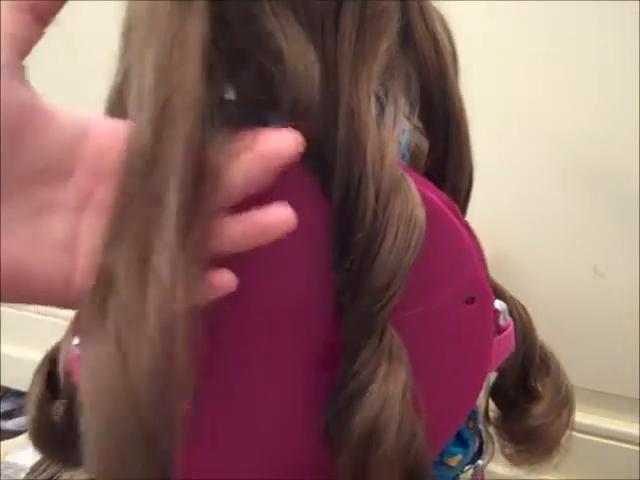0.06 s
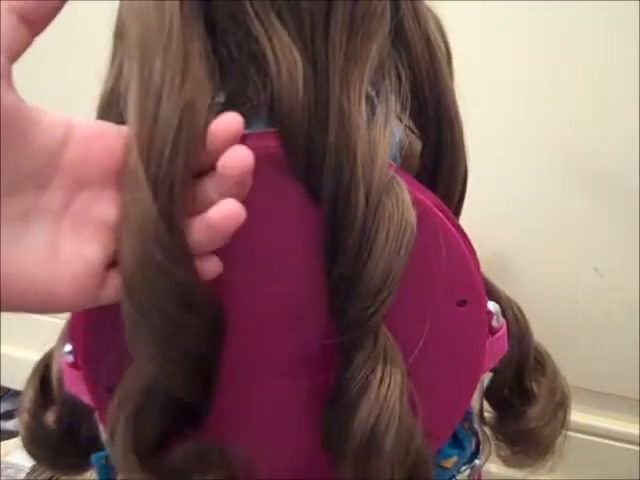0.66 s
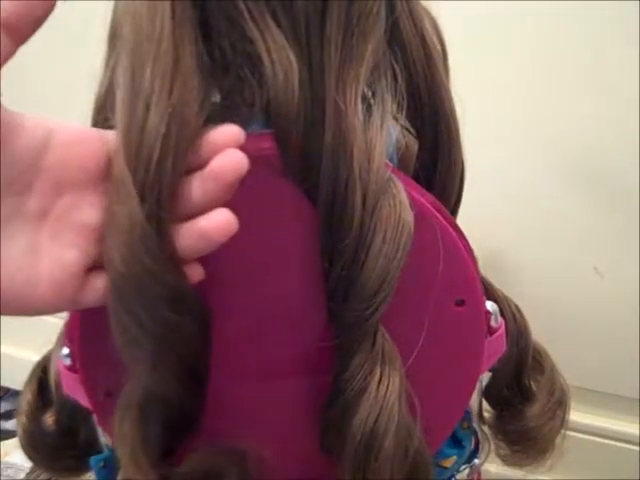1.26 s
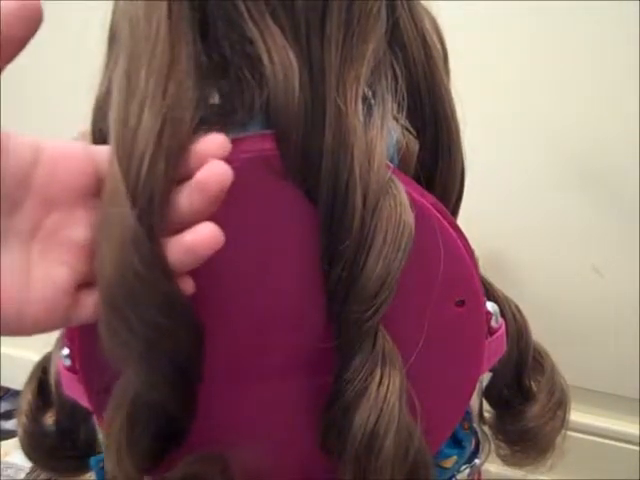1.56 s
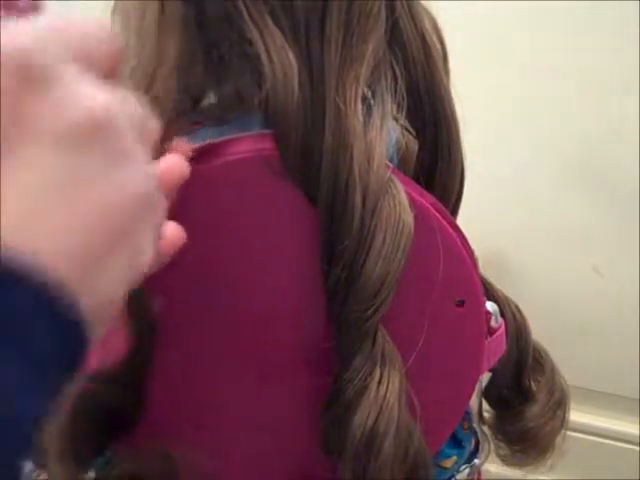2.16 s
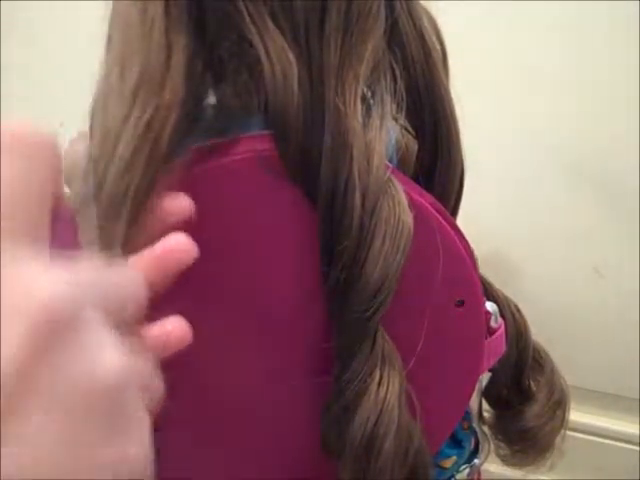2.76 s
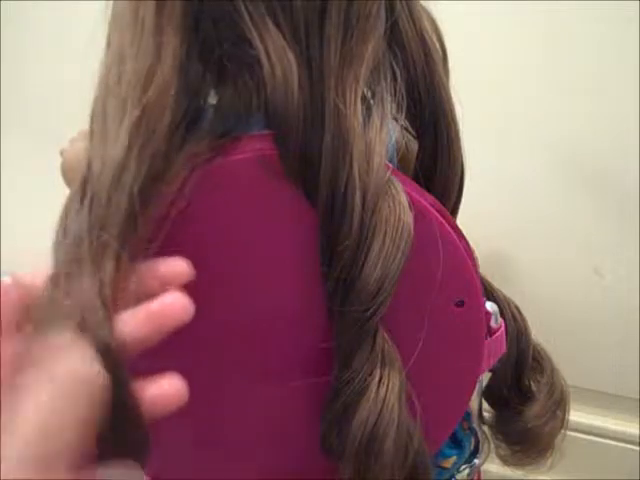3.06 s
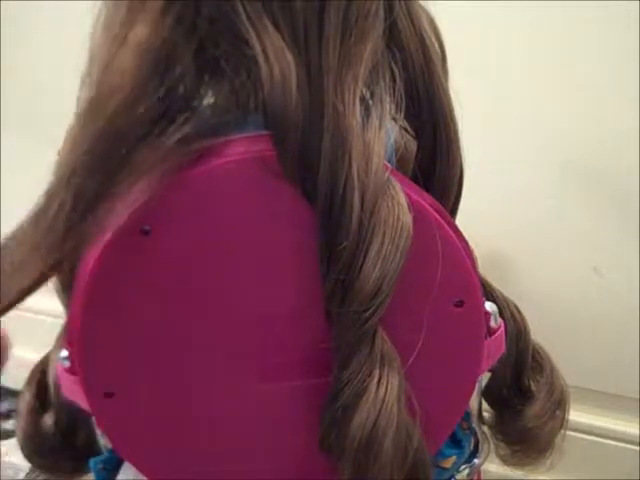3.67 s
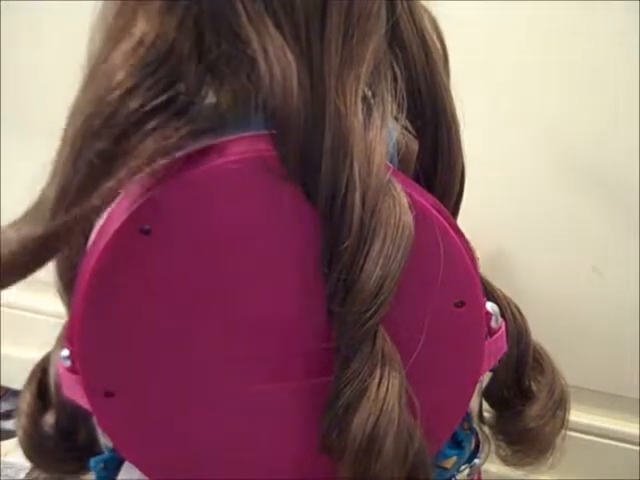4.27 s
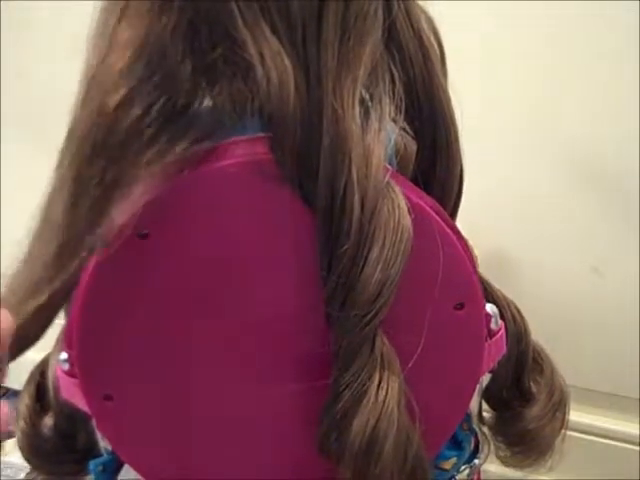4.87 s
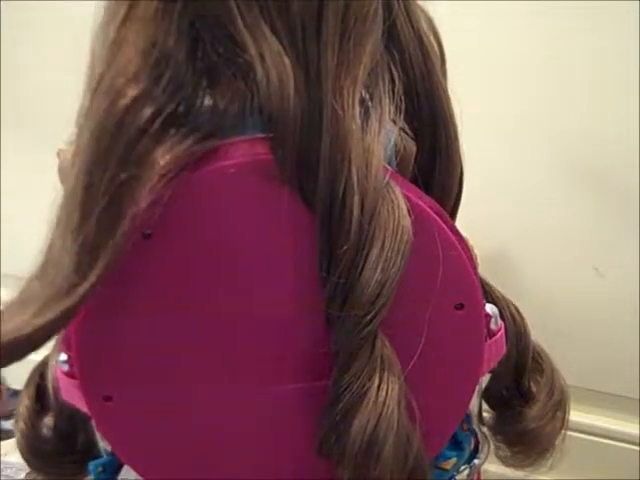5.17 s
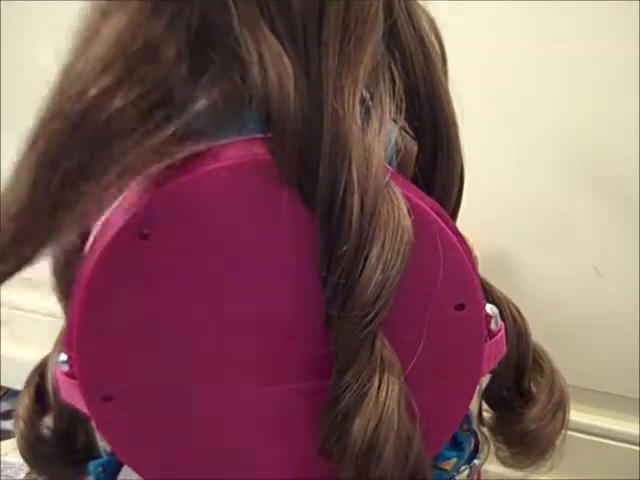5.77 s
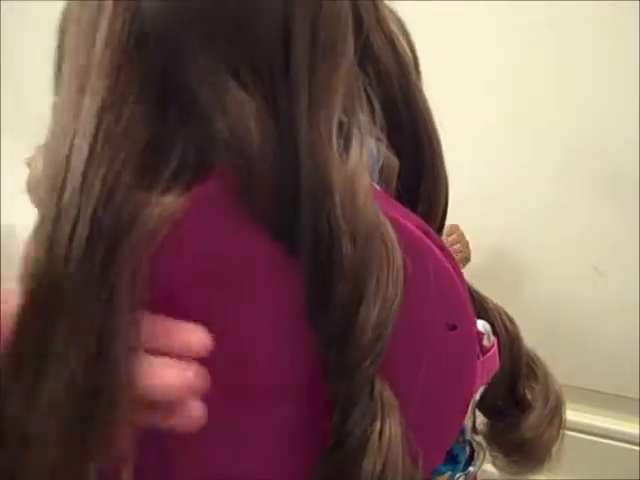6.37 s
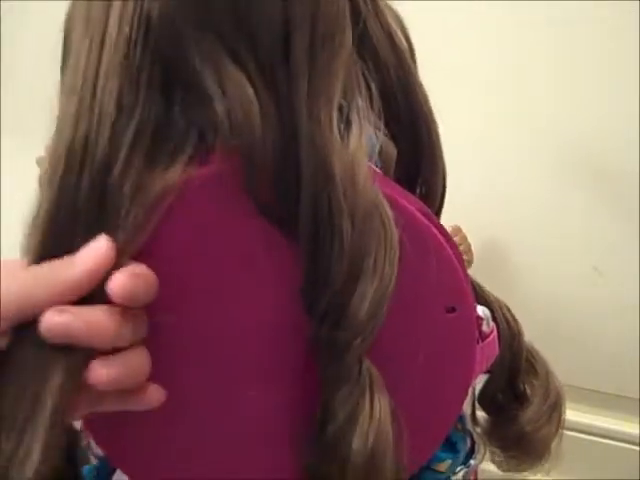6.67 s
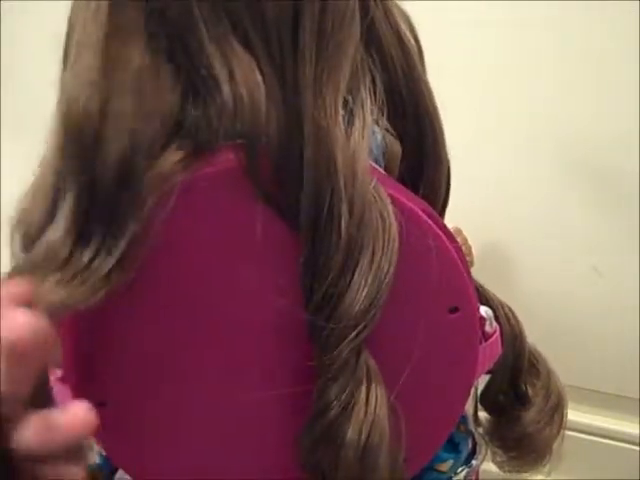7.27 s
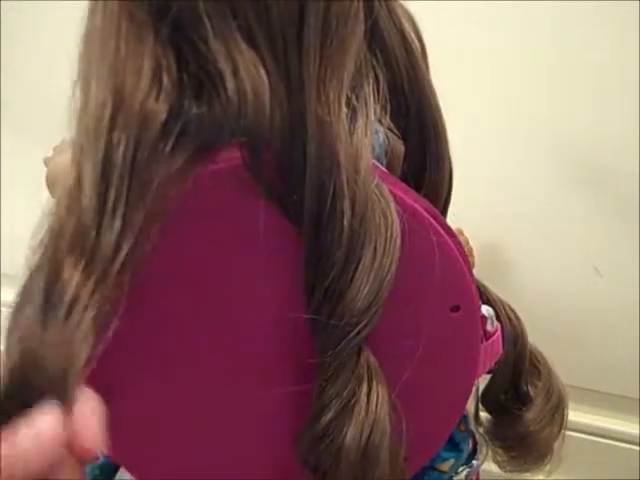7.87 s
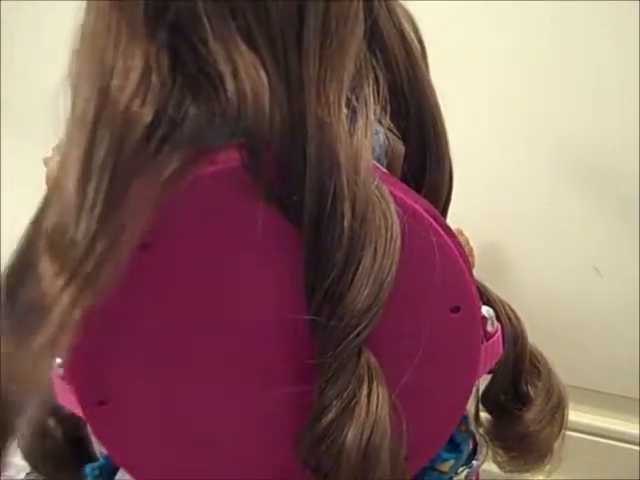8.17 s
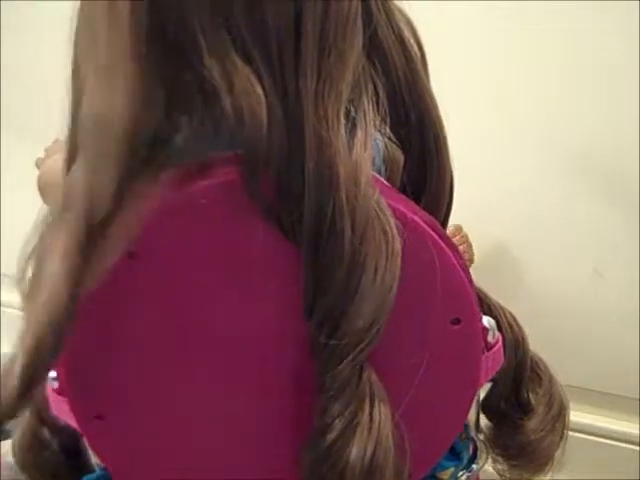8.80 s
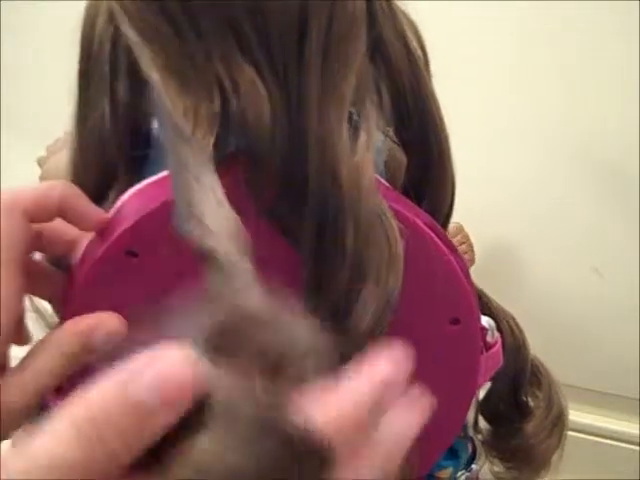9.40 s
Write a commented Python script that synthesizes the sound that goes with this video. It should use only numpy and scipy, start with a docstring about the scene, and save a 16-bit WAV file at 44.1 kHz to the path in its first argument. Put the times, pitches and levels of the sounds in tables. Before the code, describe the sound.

Hair rustles softly, a spray bottle spritzes four times and is set down hard, then a brush pulls through tangles.

```python
"""A small quiet room: a doll's hair is handled, misted and brushed at close range.
Her hollow head bumps. A trigger sprayer clicks and hisses through four pumps, then the bottle
is put down hard and rocks to rest. Brush strokes follow: strands hiss under tension, bristles
snap out of tangles and fingers slide down the hair. A distant appliance hums over soft room noise."""
import sys
import numpy as np
from scipy import signal
from scipy.fft import rfft, irfft, next_fast_len
from scipy.io import wavfile
from scipy.ndimage import map_coordinates

SR = 44100
rng = np.random.default_rng(int(sys.argv[2]) if len(sys.argv) > 2 else 0)


def materialize(psi):
    """Save the field psi as 16-bit PCM at rate SR to the path in sys.argv[1].

    A 1-D psi becomes a single channel; in a 2-D psi each row is a channel.
    """
    bounded = np.clip(np.atleast_2d(psi).T, -1, 1)
    quanta = np.round(bounded * 32767).astype(np.int16)
    wavfile.write(sys.argv[1], SR, quanta)


N = 416304

# Table levels are relative, ahead of mix gains.
# Brush pulls. Each row: start and end in seconds, then final hiss, growth and final scrape in dB.
BRUSH_PULLS = [(4.451, 4.672, -41.5, 5.5, -48.5), (4.958, 5.102, -39.5, 4.5, -46.5),
               (5.415, 5.553, -41, 7, -44), (5.973, 6.692, -45, 11.5, -59), (7.033, 7.188, -39, 16, -49.5),
               (7.572, 7.681, -45, 3.5, -54.5)]
# Finger slides. Each row: middle and half length in seconds, hiss and scrape in dB.
FINGER_SLIDES = [(0.05, .2, -59.5, -57.5), (0.416, 0.075, -50.5, -59), (0.556, 0.17, -54, -64),
                 (0.918, 0.18, -52.5, -53.5), (1.148, 0.074, -55.5, -66), (1.413, 0.093, -55, -65),
                 (1.598, 0.067, -54, -64), (2.13, 0.081, -52, -52.5), (2.62, 0.56, -56, -57),
                 (2.938, 0.078, -52, -59), (3.422, 0.081, -45, -53), (3.695, 0.15, -60.5, -59.5),
                 (3.951, 0.14, -56.5, -56), (6.136, .14, -53, -72), (6.463, 0.28, -46, -56),
                 (6.848, 0.15, -56, -74), (8.62, 0.44, -60, -71), (9.114, 0.093, -52.5, -55),
                 (9.27, 0.27, -55, -56)]
# Bristles snapping free. Each row: time in seconds, level in dB, pad and clack offsets in dB.
BRISTLE_SNAGS = [(0.373, -29, -17, -5), (0.392, -23, -12, -6), (0.928, -24.5, -20, -17),
                 (0.971, -31, -25, -22), (1.14, -28.5, -20, -12), (3.9105, -30, -27, -20),
                 (3.9594, -20.5, -3, -4.5), (3.9714, -25, -27, -14), (4.0412, -31, -22, -11),
                 (4.0696, -18, 4.5, -37), (4.0764, -22, -16.5, -17), (4.6074, -18.5, -29, -15),
                 (5.0564, -23.5, -4, -6.5), (5.0764, -9, -5.5, -14), (5.0894, -13, -1.5, -30),
                 (5.5159, -14, -29, -9), (5.5338, -10.5, -9.5, -29), (5.5424, -18, 1, -29),
                 (5.5508, -10.5, -24, -29), (6.2896, -23, -12, -6), (6.5051, -15.5, -10.5, -14),
                 (7.0414, -20, -30, -21), (7.0688, -18.5, -24, -17), (7.2145, -20, -30, -8),
                 (7.5906, -20.5, -27, -21), (7.6585, -20.5, -11.5, -24), (8.6492, -27.5, -21, -18)]
# Sprayer pumps. Each row: start and end in seconds, level and growth with pressure in dB.
SPRAY_PUMPS = [(2.147, 2.231, -25.5, 2.5), (2.464, 2.512, -28, 6), (2.734, 2.815, -26.5, 6),
               (3.032, 3.112, -25.5, 8)]
# Trigger and valve. Each row: time in seconds, level in dB, bottle and lever offsets in dB.
TRIGGER_CLICKS = [(1.921, -26, -7.5, -1.5), (1.9583, -27, -29, -28), (2.0712, -25.5, 2, 1.5),
                  (2.1173, -23.5, -24, -8), (2.1284, -22, -27, -17), (2.1507, -20.5, 7.5, -3),
                  (2.3106, -23.5, -11.5, -9.5), (2.4375, -15, -13, -25), (2.6762, -20.5, -1.5, 6),
                  (2.715, -10, -14, -22), (2.903, -29, -22, -5), (2.9595, -12.5, -3.5, 5.5),
                  (3.018, -4, -21.5, -24), (3.236, -22.5, -24.5, -11), (3.247, -22, -13, -16),
                  (3.2747, -5, -11, 1.5)]
# Bottle landing. Each row: time in seconds, shell and base levels in dB.
BOTTLE_HITS = [(3.481, -17.5, -15), (3.492, 1, -17), (3.549, -18, -29), (3.594, -32.5, -40.5),
               (3.641, -37.5, -44.5), (3.669, -39.5, -50)]
# Soft head bumps. Each row: time in seconds, level in dB.
HEAD_BUMPS = [(0.469, -32), (0.564, -33), (0.838, -32), (0.845, -28.5), (0.928, -27.5), (0.934, -33.5)]
# Light knocks. Each row: time in seconds, level in dB, pitch and width in Hz, t60 in seconds.
PLASTIC_KNOCKS = [(0.034, -31, 690, 410, 0.11), (0.034, -35, 362, 120, 0.12),
                  (0.169, -34.5, 850, 870, 0.035), (0.374, -43.5, 900, 1410, 0.066),
                  (1.135, -43.5, 890, 1220, 0.092), (1.136, -38, 4420, 1210, 0.029),
                  (1.283, -35.5, 4370, 900, 0.014), (1.361, -38.5, 1465, 199, 0.051),
                  (1.361, -40, 2880, 2420, 0.027), (1.921, -27.5, 3230, 1190, 0.016),
                  (1.928, -31.5, 5400, 900, 0.017), (3.433, -31.5, 2860, 1510, .015),
                  (6.291, -34.5, 700, 1179, 0.071), (6.429, -41, 935, 900, .025),
                  (6.732, -38.5, 835, 696, 0.029), (7.923, -24.5, 329, 241.9, 0.03),
                  (8.666, -34.5, 1000, 1200, 0.092), (9.157, -36.5, 855, 900, 0.13),
                  (9.237, -32, 1250, 1440, 0.057), (9.323, -42.5, 1420, 1086, 0.066),
                  (9.416, -42.5, 1200, 1360, 0.15)]

# Body resonances. Each row: frequency in Hz, width in Hz, gain in dB.
LEVER_MODES = [(1306, 700, -12), (2050, 560, -4), (2400, 320, 2), (2700, 340, 0), (3270, 500, -7)]
SHELL_MODES = [(1965, 250, -16.5), (3100, 600, -9), (4440, 201, 3.5), (5030, 520, -3), (7906, 440, -1),
               (11130, 4700, -22.5)]
BASE_MODES = [(218, 87, -16.5), (740, 220, -5), (1050, 330, -6), (1450, 225, -5), (2033, 151.6, -10)]
HEAD_MODES = [(75.6, 22, 2.5), (119, 22, -3.5), (185, 46, -3), (234, 21, 7.5), (352, 40, -8),
              (503, 60, -5.5), (631, 39, 1), (910, 120, -12), (1146, 39, -6), (1480, 140, -23)]

# Spectra as heard; the bright peak near 8 kHz is the microphone's resonance.
# Each row: frequency in Hz, spectral level in dB.
STRAND_SPECTRUM = [(1200, -28), (2800, -13), (5000, -11), (6600, -6), (7600, 0), (8200, 0), (9200, -10.5),
                   (11000, -17), (14000, -19.5)]
PAD_SPECTRUM = [(200, -17.5), (500, -1.5), (700, -1), (950, 1.5), (1400, -7), (2000, -8.5), (2800, -12.5),
                (4500, -14), (9000, -49)]
BRISTLE_SPECTRUM = [(1500, -34), (3500, -10.5), (5000, -3), (6300, 1.5), (7200, 4), (8100, 7.5),
                    (9500, -12.5), (14000, -19)]
MIST_SPECTRUM = [(180, -60), (300, -44), (414, -31), (1100, -27.5), (1880, -20), (2240, -20.5), (3460, -14),
                 (3750, -13.5), (4770, -9.5), (5970, -12), (7850, 0), (10800, -16.5), (14000, -20.5)]
SNAP_SPECTRUM = [(1500, -37), (3800, -4.5), (5000, -5), (6500, -3.5), (8000, 7.5), (9500, -8),
                 (14000, -22.5)]
RATTLE_SPECTRUM = [(200, -15.5), (700, 2), (1500, 1), (3400, -5), (4100, -2.5), (4470, 5), (4900, -2.5),
                   (6500, 0.5), (7800, 4), (10000, -7.5), (14000, -33)]
CRUNCH_SPECTRUM = [(300, -17), (1200, 0.5), (3000, -7.5), (7000, -3.5), (10000, -8), (14000, -34)]
ROOM_SPECTRUM = [(15, -44.5), (25, -17.5), (65, -10), (100, -10.5), (147, -6), (202, -5.5), (225, -12),
                 (363, -15.5), (539, -22.5), (1020, -26.5), (1470, -28.5), (1680, -29.5), (6160, -34.5),
                 (8240, -33), (14000, -38.5)]

# Distant appliance. Each row: frequency in Hz, level in dB.
HUM_PARTIALS = [(60, -68), (120, -59.5), (147, -57.5)]
# Room noise coherence. Each row: frequency in Hz, left-right correlation.
ROOM_COHERENCE = [(60, 0.85), (130, 0.76), (290, .72), (640, 0.456), (1400, 0.12), (3000, 0.021)]
# Room noise balance. Each row: frequency in Hz, left minus right in dB.
ROOM_BALANCE = [(60, -8.5), (200, -1), (400, 2.5), (800, 6.5), (4400, 3), (8000, 3.5), (14000, 0)]
# Wall reverberation. Each row: frequency in Hz, t60 in seconds.
WALL_DECAY = [(150, 0.54), (800, 0.15), (3000, 0.27), (8000, 0.19), (14000, 0.11)]
# Shadowing. Each row: frequency in Hz, factor on the left-right difference.
SHADOW = [(200, .1), (1000, 0.1), (4000, 0.58), (8000, 1.125), (13000, 1.19)]

BITE_S, RELEASE_DB_PER_S = 0.01, 281  # bristles enter; strands settle
REST_HISS_DB, REST_SCRAPE_DB = -67.5, -67.5  # hair never lies quite still
STRAY_PER_S, STRAY_DB = 12, -71
CREAK_PER_S, CREAK_DB, CREAK_REACH_S = 60, -58, 0.12  # spring ticks around each pump
SQUEEZE_LEAD_S, SQUEEZE_HALF_S = 0.0302, 0.082  # squeeze peaks just before the mist
BAND_LIMIT_HZ = 14300


def hair():
    """Strands hiss and prickle under brush and fingers; bristles catch and snap free."""
    hiss_level, scrape_level = rubbing_levels()
    grip = amp(0.9 * wobble(70) - 2.5)
    strands = friction(STRAND_SPECTRUM, grain_db=2.5, grain_per_s=1500)
    flicks = amp(-10.5) * prickles(per_s=190)
    hiss = hiss_level * grip * (strands + flicks)
    scrape = scrape_level * grip * friction(PAD_SPECTRUM, grain_db=5, grain_per_s=350)
    snags = clicks(BRISTLE_SNAGS, BRISTLE_SPECTRUM, snap_t60_s=0.0075,
                   body=band(hz=913, width_hz=470), body_t60_s=0.017,
                   clack=band(hz=2950, width_hz=3800), clack_t60_s=0.034)
    strays = amp(STRAY_DB) * prickles(STRAY_PER_S)
    return (placed(hiss, left_db=8, room_db=-13.5)
            + placed(scrape, left_db=2, room_db=-5)
            + placed(amp(-5) * snags + strays, left_db=8.5, room_db=-11.5))


def rubbing_levels():
    """Hiss and scrape envelopes: a pull bites, tightens and lets go; a slide swells and fades."""
    t = np.arange(N) / SR
    hiss_power = np.full(N, amp(REST_HISS_DB) ** 2)
    scrape_power = np.full(N, amp(REST_SCRAPE_DB) ** 2)
    for start_s, end_s, hiss_db, growth_db, scrape_db in BRUSH_PULLS:
        slack = np.clip((end_s - t) / (end_s - start_s), 0, 1)
        bite = np.clip((t - start_s) / BITE_S, 0, 1)
        release_db = RELEASE_DB_PER_S * np.clip(t - end_s, 0, 1)
        pull = bite * amp(-growth_db * slack - release_db)
        hiss_power += (amp(hiss_db) * pull) ** 2
        scrape_power += (amp(scrape_db - 2 * slack) * pull) ** 2
    for middle_s, half_s, hiss_db, scrape_db in FINGER_SLIDES:
        swell = np.clip(1 - ((t - middle_s) / half_s) ** 2, 0, 1) ** 2
        hiss_power += (amp(hiss_db) * swell) ** 2
        scrape_power += (amp(scrape_db) * swell) ** 2
    return np.sqrt(hiss_power), np.sqrt(scrape_power)


def sprayer():
    """The trigger creaks and clicks, the squeezed bottle hums and the mist grows with pressure."""
    t = np.arange(N) / SR
    flow, squeeze, creaking = np.zeros((3, N))
    for start_s, end_s, db, growth_db in SPRAY_PUMPS:
        valve = np.clip((t - start_s) / 0.0056, 0, 1) * np.clip((end_s - t) / 0.015 + 0.5, 0, 1)
        pressure = np.sqrt(np.clip((t - start_s) / (end_s - start_s), 0, 1))
        flow += valve * amp(db + growth_db * (pressure - 0.3))
        squeeze += np.clip(1 - np.abs(t - start_s + SQUEEZE_LEAD_S) / SQUEEZE_HALF_S, 0, 1)
        creaking[(t > start_s - CREAK_REACH_S) & (t < end_s + CREAK_REACH_S)] = 1
    mist = flow * friction(MIST_SPECTRUM, grain_db=1, grain_per_s=1100)
    # droplets land on the hair, to one side of the jet
    patter = amp(-9.5) * flow * friction(STRAND_SPECTRUM, grain_db=2, grain_per_s=1100)
    hum = amp(-51.5) * squeeze * unit(filtered(rng.standard_normal(N), band(hz=472, width_hz=130)))
    creaks = amp(CREAK_DB) * creaking * prickles(CREAK_PER_S)
    trigger = clicks(TRIGGER_CLICKS, SNAP_SPECTRUM, snap_t60_s=0.0063,
                     body=band(hz=520, width_hz=400), body_t60_s=0.04995,
                     clack=resonances(LEVER_MODES), clack_t60_s=0.013)
    return (placed(mist + hum, left_db=4.5, room_db=-12, near_db=-13.5)
            + placed(patter, left_db=15.5, room_db=-13.5, lead_samples=3)
            + placed(amp(-5.5) * trigger + creaks, left_db=6.5, room_db=-11, near_db=-3.5))


def bottle():
    """The bottle lands on its edge, slaps flat and rocks to rest; loose parts rattle."""
    track = np.zeros(N)
    for at_s, shell_db, base_db in BOTTLE_HITS:
        add(track, at_s, amp(shell_db) * contact(resonances(SHELL_MODES), t60_s=0.018, hardness=1))
        add(track, at_s, amp(base_db) * contact(resonances(BASE_MODES), t60_s=0.032))
        rattle = contact(colour(RATTLE_SPECTRUM), t60_s=0.27, hardness=0)
        add(track, at_s, amp(shell_db - 27.5) * rattle)
    return placed(track, left_db=4.5, room_db=-11, lead_samples=0)


def handling():
    """Bumps ring the hollow head, clatter a tray and crunch the hair; plastic things are knocked."""
    bumps, knocks = np.zeros((2, N))
    for at_s, db in HEAD_BUMPS:
        add(bumps, at_s, amp(db + 2) * contact(resonances(HEAD_MODES), t60_s=0.1, hardness=0.68))
        add(bumps, at_s, amp(db - 10) * contact(band(hz=730, width_hz=600), t60_s=0.051))  # tray
        add(knocks, at_s, amp(db - 8.5) * contact(colour(CRUNCH_SPECTRUM), t60_s=0.051))
    for at_s, db, hz, width_hz, t60_s in PLASTIC_KNOCKS:
        add(knocks, at_s, amp(db) * contact(band(hz, width_hz), t60_s, hardness=0.9))
        add(knocks, at_s, amp(-51.5) * contact(colour(SNAP_SPECTRUM), t60_s=0.027))
    # carried through the table: louder on the right, slightly out of phase
    table_bumps = amp([[-5], [4]]) * placed(bumps, left_db=-14, room_db=-12.5, lead_samples=10.6)
    return table_bumps + placed(knocks, left_db=7, room_db=-11)


def room_tone():
    """Soft rumble and hiss with the wavering hum of a distant appliance."""
    def mid_side_gains(hz):
        angle = np.arccos(np.clip(along(ROOM_COHERENCE, hz), -1, 1)) / 2
        return amp(along(ROOM_SPECTRUM, hz)) * [np.cos(angle), np.sin(angle)]
    mid, side = filtered(rng.standard_normal((2, N)), mid_side_gains)
    air = np.array([mid + side, mid - side])
    air = unit(filtered(air, lambda hz: amp(along(ROOM_BALANCE, hz) * [[0.5], [-0.5]])))
    t = np.arange(N) / SR
    hum = np.zeros(N)
    for hz, db in HUM_PARTIALS:
        waver = amp(4.1 * wobble(7))
        hum += amp(db) * unit(waver * np.sin(2 * np.pi * hz * t + 0.98 * wobble(13)))
    return amp(-51.5) * air + hum


def friction(spectrum, grain_db, grain_per_s):
    """Countless tiny slips of uneven size, rms 1."""
    slips = rng.standard_normal(N) * amp(grain_db * wobble(grain_per_s))
    return unit(filtered(slips, colour(spectrum)))


def prickles(per_s):
    """Tiny bright snaps at random moments, rms 1."""
    impulses = (rng.random(N) < per_s / SR) * rng.standard_normal(N)
    return unit(filtered(impulses, colour(SNAP_SPECTRUM)))


def clicks(rows, snap_spectrum, snap_t60_s, body, body_t60_s, clack, clack_t60_s):
    """Stiff plastic lets go: a bright snap, a clack of the part and a ring of its holder."""
    track = np.zeros(N)
    for at_s, db, body_db, clack_db in rows:
        # longer rings spread their energy more thinly
        clack_gain = amp(db + clack_db) * np.sqrt(snap_t60_s / clack_t60_s)
        body_gain = amp(db + body_db) * np.sqrt(snap_t60_s / body_t60_s)
        add(track, at_s, amp(db) * contact(colour(snap_spectrum), snap_t60_s, hardness=0.66))
        add(track, at_s, clack_gain * contact(clack, clack_t60_s, hardness=1))
        add(track, at_s, body_gain * contact(body, body_t60_s))
    return track


def contact(response, t60_s, hardness=0.54):
    """A first impulse and a dying chatter ring a body."""
    decay = amp(-60 * np.arange(SR // 5) / SR / t60_s)
    force = decay * rng.standard_normal(len(decay))
    force[0] = hardness * np.linalg.norm(decay)
    return unit(filtered(force, response)) * np.sqrt(np.mean(decay ** 2))


def placed(x, left_db, room_db, lead_samples=1, near_db=-9):
    """Mono to stereo: direct path leading on the left, near reflections and wall reverberation."""
    hz, t, noise = signal.stft(rng.standard_normal((2, SR // 2)), SR, nperseg=256)
    decay = amp(-60 * t / along(WALL_DECAY, hz)[:, None])
    tail = signal.istft(noise * decay, SR, nperseg=256)[1]
    tail = np.pad(tail / np.linalg.norm(tail[0]), ((0, 0), (SR // 250, 0)))
    # hand and doll scatter the treble differently to each side
    near = rng.standard_normal((2, SR // 400))
    near = np.pad(near / np.linalg.norm(near[0]), ((0, 0), (0, tail.shape[1] - near.shape[1])))
    hz = np.fft.rfftfreq(tail.shape[1], 1 / SR)
    shadow = along(SHADOW, hz)
    sides = np.array([[0.5], [-0.5]])
    direct = amp(sides * left_db * shadow) * np.exp(2j * np.pi * hz * sides * lead_samples / SR)
    scatter = amp(near_db) * shadow ** 2 * rfft(near)
    walls = amp(room_db + sides * left_db / 2) * rfft(tail)
    margin = SR // 100  # holds the leading side's early arrival
    paths = np.roll(irfft(direct + scatter + walls), margin, axis=1)
    return signal.oaconvolve(x[None], paths, axes=1)[:, margin:margin + N]


def resonances(modes):
    """Response of a body: modes summed with alternating sign."""
    return lambda f: sum((-1) ** k * amp(db) * 1j * f * width_hz / (hz * hz - f * f + 1j * f * width_hz)
                         for k, (hz, width_hz, db) in enumerate(modes))


def band(hz, width_hz):
    """One broad resonance with steep skirts."""
    return lambda f: resonances([(hz, width_hz, 0)])(f) ** 2


def colour(spectrum):
    """Minimum-phase response with this spectrum."""
    def response(hz):
        cepstrum = irfft(np.log(amp(along(spectrum, hz))))
        half = len(cepstrum) // 2
        return np.exp(rfft(np.r_[cepstrum[0], 2 * cepstrum[1:half]], 2 * half))
    return response


def filtered(x, response):
    """Apply a complex frequency response."""
    n = x.shape[-1]
    size = 2 * next_fast_len(n // 2 + 2048)
    return irfft(rfft(x, size) * response(np.fft.rfftfreq(size, 1 / SR)), size)[..., :n]


def wobble(per_s):
    """Smooth random curve, per_s knots a second."""
    knots = rng.standard_normal(int(N * per_s / SR) + 4)
    return map_coordinates(knots, [np.arange(N) * per_s / SR], order=2)


def along(points, hz):
    """Interpolate (Hz, value) points on a log axis."""
    knots_hz, values = np.transpose(points)
    return np.interp(np.log(hz + 1), np.log(knots_hz + 1), values)


def add(track, at_s, sound):
    """Mix a sound into a track."""
    part = track[round(at_s * SR):][:len(sound)]
    part += sound[:len(part)]


def amp(db):
    """Decibels to gain."""
    return 10 ** (np.asarray(db) / 20)


def unit(x):
    """Scale to rms 1."""
    return x / np.sqrt(np.mean(x ** 2) + 1e-20)


def scene():
    """Stereo sum of all sources."""
    return hair() + sprayer() + bottle() + handling() + room_tone()


def record(dry):
    """Overload at full scale, then a steep low-pass."""
    return filtered(np.clip(dry, -1, 1), lambda hz: 1 / np.sqrt(1 + (hz / BAND_LIMIT_HZ) ** 160))


dry = scene()
out = record(dry)
materialize(out)
```